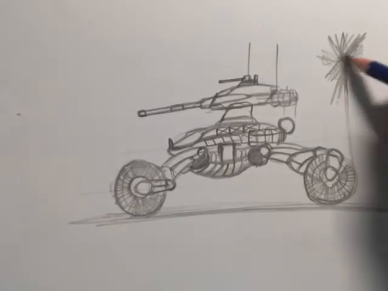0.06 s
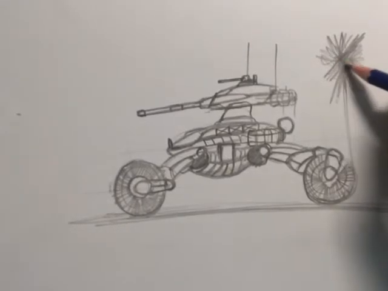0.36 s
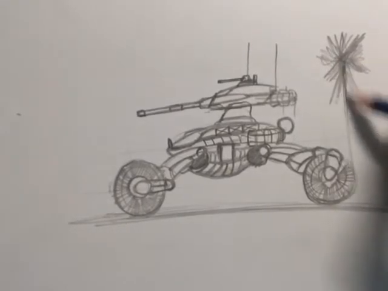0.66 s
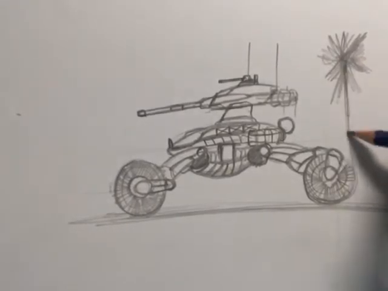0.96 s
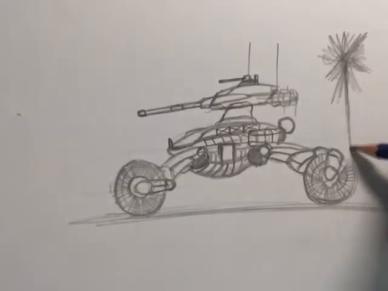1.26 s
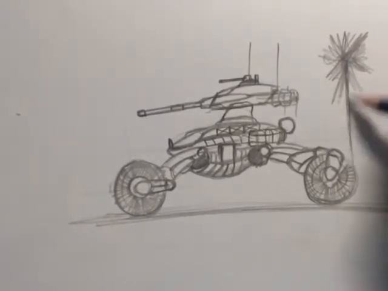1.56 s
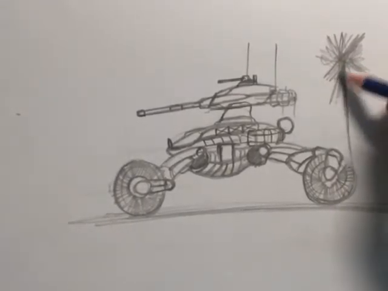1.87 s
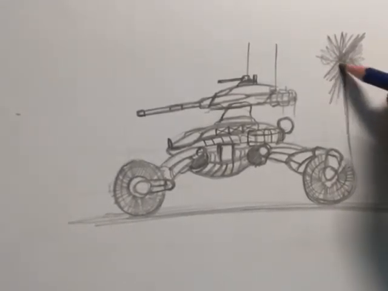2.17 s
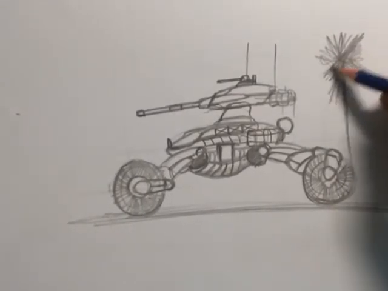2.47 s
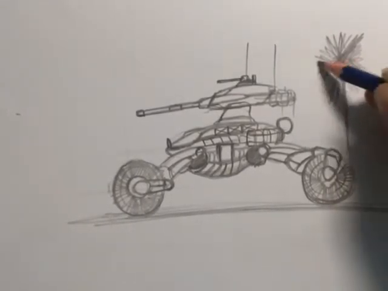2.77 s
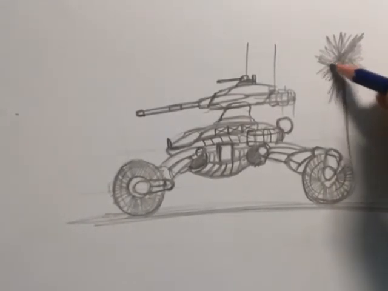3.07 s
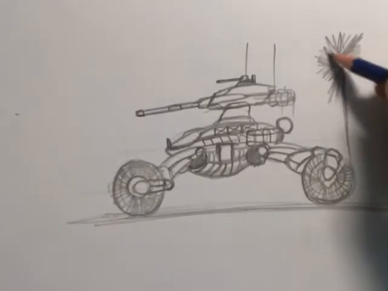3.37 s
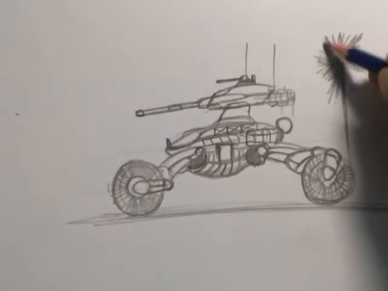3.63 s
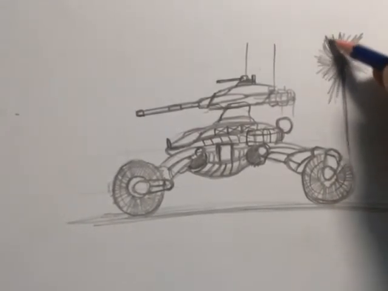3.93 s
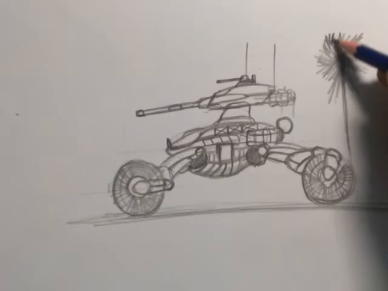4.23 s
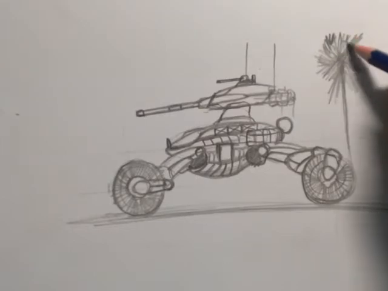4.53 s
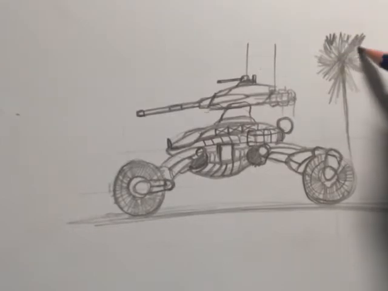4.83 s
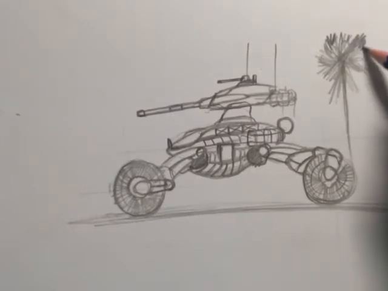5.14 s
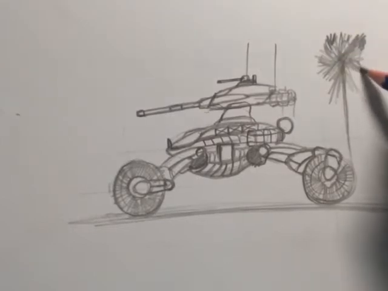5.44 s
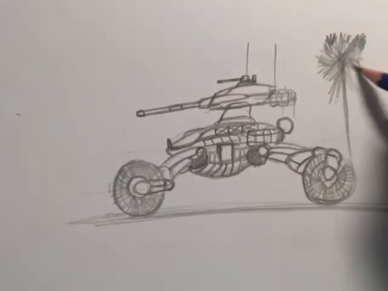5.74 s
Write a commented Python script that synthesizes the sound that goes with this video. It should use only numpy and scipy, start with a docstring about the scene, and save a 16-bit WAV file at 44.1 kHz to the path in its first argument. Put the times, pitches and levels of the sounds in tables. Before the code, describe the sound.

Light pencil lines turn into quick back-and-forth shading on paper, with a brief wooden clatter in the middle, in a quiet room.

```python
"""A pencil sketches on paper: a few separate lines, then quick short strokes back and forth.
The lead scratches as it catches on the paper's grain, and the sheet rasps under it.
Now and then the lead clicks down, and once the hand slides over the page.
Halfway through, something wooden bumps and rattles, and the room echoes briefly.
Underneath lie an uneven room rumble, faint hums, a short far drone and a hiss."""
import sys
import numpy as np
from scipy import signal
from scipy.fft import rfft, irfft, next_fast_len
from scipy.io import wavfile

SR = 44100
rng = np.random.default_rng(int(sys.argv[2]) if len(sys.argv) > 2 else 0)


def persist_wave(psi):
    """Save psi, clipped to +-1, as 16-bit WAV."""
    counts = np.round(np.clip(psi, -1, 1) * 32767).astype(np.int16)
    wavfile.write(sys.argv[1], SR, np.atleast_2d(counts).T)


N = 264598
TIME = np.arange(N) / SR
TOP_HZ = 9070  # the treble ends here

# single strokes: middle t/s, length/s, relative scratch level/dB, relative rasp level/dB
SINGLE_STROKES = [(0.083, 0.073, -71, -67), (0.225, 0.044, -62, -67.5), (0.296, 0.039, -57, -62.5),
                  (0.42, 0.11, -65.5, -69), (0.558, 0.038, -63.5, -66.5), (0.668, 0.062, -56, -67.5),
                  (0.779, 0.067, -60, -70), (0.926, 0.064, -54.5, -64), (1.045, 0.064, -56.5, -63),
                  (1.19, 0.066, -52.5, -61.5), (1.314, 0.07, -62, -68), (1.417, 0.043, -56, -61.5),
                  (1.752, 0.074, -87, -65.5), (1.823, 0.023, -87, -58), (1.898, 0.04, -58.5, -59),
                  (1.979, 0.056, -59, -58.5), (2.054, 0.049, -67, -68), (5.288, 0.054, -68.5, -70),
                  (5.958, 0.12, -66, -73.5)]
# tone of the early lines, the later short strokes and the sheet's rasp: f/Hz, level/dB
LINE_TONE = [(300, -26), (2550, -26), (3150, -10.5), (3800, -18.5), (4400, -12), (5000, -12.5), (5450, -9),
             (5950, -0.5), (6700, -1.5), (7900, -7), (8400, -1), (9100, -7.5)]
SHORT_STROKE_TONE = [(300, -11), (2400, -23), (3500, -22.5), (4500, -15.5), (5350, -14), (5850, -1.5),
                     (6350, 1.5), (7200, -1), (7700, -1.5), (8200, -5), (8700, 3.5), (9100, -5.5)]
RASP_TONE = [(120, -28), (300, -3.5), (600, -10), (800, -1), (1150, -15), (1450, -7), (1900, -6),
             (2250, -17), (3200, -15.5), (5000, -16)]
# the sheet's ring drifts as the lead moves over the page: t/s, f/Hz
SHEET_PITCH = [(0, 1520), (1.0, 1720), (2.0, 1800), (2.9, 1410), (3.95, 1350), (4.45, 1900), (5.3, 1740),
               (5.85, 1380)]
def pencil(short_from_s=2.05, scratch_gain_db=-0.02, rasp_gain_db=2.5, pitch_spread=0.043):
    """Each stroke speeds up and slows down; the lead catches on the paper's grain in tiny bursts."""
    t = TIME[:SR // 3]
    fibres, grip = wander(hz=700), wander(hz=170)  # single fibres, and wider patches that grip
    scratches, rasps = np.zeros((2, 2, N))
    for middle, length, scratch_db, rasp_db in SINGLE_STROKES + shading_strokes():
        start = max(middle - t[-1] / 2, 0)
        speed = bell(start + t - middle, length)
        ring_hz = np.interp(middle, *np.transpose(SHEET_PITCH))
        ring_hz *= 1 + pitch_spread * rng.standard_normal()
        tone = LINE_TONE if middle < short_from_s else SHORT_STROKE_TONE
        scratch = paper_spot(noise(tone, len(t), side=0.41), ripple_db=2.5, spacing_hz=168.6)
        rasp = paper_spot(noise(RASP_TONE, len(t), side=1), ripple_db=3.0, spacing_hz=90)
        rasp = sheet_ring(rasp, ring_hz)
        add(scratches, start, amp(scratch_db) * np.sqrt(speed) * scratch)  # power follows speed
        add(rasps, start, amp(rasp_db) * np.sqrt(speed) * rasp)
    scratches *= unit(amp(1.3 * fibres + 0.73 * grip))
    rasps *= unit(amp(2.0 * fibres + 0.73 * grip))
    return amp(scratch_gain_db) * scratches + amp(rasp_gain_db) * rasps


# back-and-forth runs: first t/s, last t/s, number of strokes, first level/dB, last level/dB,
# extra level midway/dB, rasp level offset/dB
SHADING_RUNS = [(2.143, 2.729, 8, -71.5, -64, 2.5, 0.5), (2.820, 3.526, 9, -64, -60, 1, -1),
                (3.611, 3.847, 4, -57.5, -62.5, 0.5, -5.5), (3.93, 4.264, 6, -59, -63.5, 3.5, -8.5),
                (4.451, 4.8, 6, -61.5, -58, -1, -7), (4.866, 5.178, 6, -61, -70, 0.5, -7),
                (5.434, 5.848, 6, -67.5, -63, 1.5, -4.5)]
def shading_strokes(fast_share=0.54, spread_db=2):
    """The hand swings at an even pace; its pressure follows a curve, but no two strokes are alike."""
    strokes = []
    for first, last, count, first_db, last_db, arch_db, rasp_db in SHADING_RUNS:
        length = fast_share * (last - first) / (count - 1)
        arch = arch_db * np.sin(np.pi * np.linspace(0, 1, count))
        levels = np.linspace(first_db, last_db, count) + arch + spread_db * rng.standard_normal(count)
        middles = np.linspace(first, last, count)
        strokes += [(s, length, db, db + rasp_db) for s, db in zip(middles, levels)]
    return strokes


def paper_spot(x, ripple_db, spacing_hz):
    """Each spot on the paper favours its own random pitches, a little different left and right."""
    grid_hz = np.arange(0, SR, spacing_hz)
    shared, left, right = rng.standard_normal((3, SR // 50))[:, :len(grid_hz)]
    ripple = np.array([np.interp(bins(x), grid_hz, shared + own) for own in (left, right)])
    return unit(irfft(rfft(x) * amp(ripple_db * ripple), x.shape[1]))


def sheet_ring(x, hz, width_hz=380, ring_db=3.5):
    """The sheet rings, which strengthens the sound near one pitch."""
    ring = amp(ring_db) / (1 + 2j * (bins(x) - hz) / width_hz)
    return unit(irfft(rfft(x) * (1 + ring), x.shape[1]))


# tone of the sliding hand: f/Hz, level/dB
HAND_TONE = [(900, -28), (1700, -10), (2250, 0), (2550, -7), (3050, 4), (3400, 3), (3750, -16), (9000, -27)]
def hand_slide(middle_s=1.626, length_s=0.17, db=-70):
    """The side of the hand rubs over the sheet with a soft hiss."""
    speed = bell(TIME - middle_s, length_s)
    return amp(db) * np.sqrt(speed) * noise(HAND_TONE, N, side=0.54)


# the lead touching down: t/s, level/dB, treble cut-off f/Hz
CLICKS = [(0.278, -53, 1590), (0.404, -53, 2800), (1.6139, -47.5, 7500), (1.632, -48.5, 2200),
          (1.822, -54, 1480), (4.939, -57, 1400), (5.858, -59, 1500)]
# tone of a click: f/Hz, level/dB
CLICK_TONE = [(300, -40), (1000, -2), (1600, -5), (2400, -1.5), (3200, -8), (4800, -9), (7000, 1),
              (9000, -4)]
def lead_clicks(fade_s=0.01, echo_db=-21, echo_s=0.95):
    """The lead clicks onto the sheet; the room answers faintly."""
    out, t = np.zeros((2, N)), TIME[:SR // 3]
    shape = fade(t, fade_s) + amp(echo_db) * fade(t, echo_s)
    for start, db, cutoff_hz in CLICKS:
        click = unit(soften(noise(CLICK_TONE, len(t), side=0.5), cutoff_hz))
        add(out, start, amp(db) * click * shape)
    return out


# knocks: t/s, ring level/dB, clatter level/dB, clatter fade/s, treble cut-off f/Hz, place hit (0-1)
WOOD_HITS = [(3.090, -40.5, -47, 0.28, 950, 0), (3.128, -44.5, -43, 0.061, 1160, 0.23),
             (3.151, -40.5, -47, 0.056, 760, 0), (3.218, -50.5, -53, 0.29, 453, 0.1),
             (3.269, -60, -55.5, 0.039, 400, 0.33), (3.307, -54, -46, 0.06, 1510, 0.5),
             (3.312, -29, -29.5, 0.24, 1750, 0.64), (3.324, -36, -37.5, 0.31, 3370, 0.8),
             (3.344, -30, -35, 0.36, 2860, 0.95), (3.374, -42.5, -34.5, 0.19, 1600, 1),
             (3.4224, -39, -31, 0.053, 1420, 0.57)]
# the notes the wood rings with: f/Hz, level hit at place 0/dB, level hit at place 1/dB, fade/s
WOOD_NOTES = [(250, -2.5, -31, 0.57), (282, 2.5, -28, 0.42), (309, -15, -2.5, 0.56),
              (368.6, -1, -1.5, 0.21), (391, 5, -17, 0.13), (511, 4, 3, 0.15), (527, -9, -8, 0.27),
              (572.6, 4, -6.5, 0.24), (606, -13, -13, 0.16), (727, -27, 3, 0.6), (710, -25, -19, .24),
              (768.5, -14, 13, 0.16), (787, -18, -0.5, 0.23), (794, 4, 6, 0.11), (854, -20, -14, 0.18),
              (1074, -3, 7, 0.13), (1119, -29, -4, 0.75), (1130, -25, 3, 0.21), (1153, 7.5, -8.5, 0.073),
              (1270, -21, -19, .2), (1430, -31, 5.5, 0.17), (1554, -22, 0.5, 0.18), (1750, -24, -4.5, 0.25),
              (2270, -32, -19, .2), (2374, -6, -11, 0.25)]
# tone of the clatter and its echo: f/Hz, level/dB
CLATTER_TONE = [(60, -43.5), (130, -19), (210, -17.5), (260, -2.5), (500, -2.5), (650, -6), (800, 5),
                (930, -8.5), (1150, 4), (1620, -15), (1950, -14), (3500, -22), (6200, -7.5), (9000, -8.5)]
def wood_knocks(rise_s=0.004, echo_db=-12, echo_rise_s=0.0044):
    """Every knock rings the same piece of wood, with a dense clatter and the room's echo."""
    out, t = np.zeros((2, N)), TIME[:2 * SR // 3]
    hz, place0_db, place1_db, ring_s = np.transpose(WOOD_NOTES)
    k = np.arange(len(WOOD_NOTES))
    skew = 0.47 * (hz / 1000) * (-1) ** k  # higher notes are more out of step between left and right
    phase = k * k + np.array([skew, -skew]) / 2
    notes = fade(t, ring_s[:, None]) * np.sin(2 * np.pi * hz[:, None] * t + phase[..., None])
    rise, echo_rise = 1 - np.exp(-t / rise_s), 1 - np.exp(-t / echo_rise_s)
    for start, ring_db, clatter_db, clatter_s, cutoff_hz, place in WOOD_HITS:
        ring = amp(place0_db + place * (place1_db - place0_db)) @ notes
        clatter = noise(CLATTER_TONE, len(t), side=0.12) * fade(t, clatter_s)
        echo_gain = amp(echo_db) * np.sqrt(10 * clatter_s)  # a longer clatter fills the room more
        clatter += echo_gain * room_echo(len(t)) * echo_rise
        for part, db in ((ring, ring_db), (clatter, clatter_db)):
            blow = soften(part * rise, cutoff_hz)
            add(out, start, amp(db) * blow / np.std(blow[:, :SR // 40]))  # first 25 ms set the level
    return out


# how long the room echoes: f/Hz, fade/s
ECHO_FADE = [(150, 0.87), (400, 0.6), (1000, 0.39), (2000, 0.23), (8000, 0.75)]
def room_echo(size):
    """The blurred echo of a knock: the bass lasts longest, and sound near 2000 Hz dies first."""
    hz, t, bands = signal.stft(noise(CLATTER_TONE, size), SR, nperseg=256)
    bands *= fade(t, read(ECHO_FADE, hz)[:, None])
    return signal.istft(bands, SR, nperseg=256)[1][:, :size]


# tone of the rumble: f/Hz, level/dB
RUMBLE_TONE = [(60, -50), (95, -18.5), (125, -7.5), (150, 3.5), (175, -10), (230, -12), (400, -22),
               (1500, -73)]
# its slow rise and fall: t/s, relative level/dB
RUMBLE_LEVEL = [(0, -60), (1.9, -60.5), (2.3, -69), (3.0, -59), (4.2, -68), (6, -65)]
# its brief swells: middle t/s, length/s, relative level/dB
RUMBLE_SWELLS = [(0.007, 0.089, -51), (0.92, 0.052, -55), (1.134, 0.067, -60.5), (1.513, 0.11, -58.5),
                 (2.914, 0.057, -53), (3.757, 0.063, -58), (5.39, 0.15, -61.5), (5.81, 0.069, -58)]
def room_rumble(gain_db=-1.5, waver_db=2.5):
    """A low rumble wavers and now and then swells."""
    rumble = noise(RUMBLE_TONE, N)
    base = amp(np.interp(TIME, *np.transpose(RUMBLE_LEVEL)) + waver_db * wander(hz=3.3))
    swell_power = sum(amp(db) ** 2 * bell(TIME - s, length) for s, length, db in RUMBLE_SWELLS)
    return amp(gain_db) * rumble * np.sqrt(base ** 2 + swell_power)


# tone of the room's rushing sound: f/Hz, level/dB
RUSH_TONE = [(60, -43), (170, -42), (230, -2), (290, 3.5), (350, -3.5), (490, -3.5), (640, -9), (800, -6),
             (1100, -13), (1600, -27.5), (2600, -29), (9000, -56)]
# its slow rise and fall: t/s, relative level/dB
RUSH_LEVEL = [(0, -59.5), (.6, -56), (1.0, -59.5), (1.9, -59.5), (3.0, -64), (4.5, -63), (6, -61)]
def room_rush(gain_db=-4.0):
    """A soft rushing sound, higher than the rumble, drifts in loudness."""
    return noise(RUSH_TONE, N) * amp(gain_db + np.interp(TIME, *np.transpose(RUSH_LEVEL)))


# the hums: f/Hz, level/dB, width/Hz
HUM_NOTES = [(200.2, -69.5, 8.6), (291.3, -78, 15), (1337, -79, 49)]
def hums():
    """Three faint notes waver in the room."""
    return sum(amp(db) * waver(hz, width_hz) for hz, db, width_hz in HUM_NOTES)


# the drone's course: t/s, f/Hz, level/dB
DRONE_PATH = [(0, 510, -68.5), (.38, 506, -75), (.55, 501.3, -63), (0.82, 495, -64.5), (.88, 383, -65),
              (1.0, 340, -100)]
def far_drone():
    """A faint, far drone drops in pitch and sinks away within the first second."""
    s, hz, db = np.transpose(DRONE_PATH)
    return amp(np.interp(TIME, s, db)) * waver(np.interp(TIME, s, hz), width_hz=19)


# tone of the hiss: f/Hz, level/dB
HISS_TONE = [(20, 8), (70, 7), (150, 12), (400, 6), (1000, 3), (2500, 0), (4000, -.5), (6300, 1), (9000, 0)]
def hiss(db=-65.0):
    """A steady hiss lies under everything."""
    return amp(db) * noise(HISS_TONE, N, side=0.16)


# how alike left and right are: f/Hz, likeness (1 = the same)
LIKENESS = [(25, .75), (125, .985), (300, .985), (600, .92), (1200, .68), (2500, .45), (8000, .45)]
# the pencil's direction at side=1: f/Hz, left minus right level/dB
PENCIL_BALANCE = [(300, -19.5), (850, -2.5), (1250, -15.5), (1550, -11), (2200, 3), (3100, 7), (4500, 4),
                  (5900, 13), (6700, 5.5), (9000, 9)]
def noise(tone, size, side=0):
    """Stereo noise shaped by a tone table, then scaled to strength 1; side leans it to the pencil."""
    padded = next_fast_len(size)
    hz = np.fft.rfftfreq(padded, 1 / SR)
    a, b = rfft(rng.standard_normal((2, padded))) * (hz < TOP_HZ)
    likeness = read(LIKENESS, hz)
    middle, wide = a * np.sqrt(1 + likeness), b * np.sqrt(1 - likeness)
    lean = amp(side * read(PENCIL_BALANCE, hz) / 2)
    spectrum = np.array([(middle + wide) * lean, (middle - wide) / lean]) * amp(read(tone, hz))
    return unit(irfft(spectrum, padded)[:, :size])


def wander(hz):
    """A smooth random wobble, with changes up to about hz."""
    x = rng.standard_normal(next_fast_len(N))
    return unit(irfft(rfft(x) * np.exp(-(bins(x) / hz) ** 2), len(x))[:N])


def waver(hz, width_hz):
    """An unsteady note on a fixed or moving pitch."""
    turns = np.cumsum(hz * np.ones(N)) / SR
    wobble = wander(width_hz) + 1j * wander(width_hz)
    return unit((wobble * np.exp(2j * np.pi * turns)).real)


def soften(x, hz):
    """A softer contact loses the treble above hz."""
    return signal.sosfilt(signal.butter(2, hz, fs=SR, output="sos"), x)


def bell(t, length):
    """A smooth rise and fall around t = 0, above half height for the given length."""
    return .5 ** (abs(2 * t / length) ** 2.4)


def fade(t, fade_s):
    """Dies away by 60 dB in fade_s seconds."""
    return amp(-60 * t / fade_s)


def amp(db):
    """Turns decibels into a multiplier."""
    return 10 ** (np.asarray(db) / 20)


def unit(x):
    """Scales a sound to an average strength (rms) of 1."""
    return x / np.sqrt(np.mean(x ** 2) + 1e-20)


def read(points, hz):
    """Reads between a table's rows, with octaves evenly spaced."""
    f, value = np.transpose(points)
    return np.interp(np.log(hz + 1), np.log(f + 1), value)


def bins(x):
    """The frequencies that make up a sound."""
    return np.fft.rfftfreq(x.shape[-1], 1 / SR)


def add(mix, s, sound):
    """Mixes a stereo sound in at s seconds."""
    part = mix[:, round(s * SR):][:, :sound.shape[1]]
    part += sound[:, :part.shape[1]]


def scene():
    """Pencil, hand, clicks and knocks over the sound of the room."""
    foreground = pencil() + hand_slide() + lead_clicks() + wood_knocks()
    return foreground + room_rumble() + room_rush() + hums() + far_drone() + hiss()


def record(dry):
    """A steep filter cuts off the highest treble."""
    treble_cut = signal.firwin(801, TOP_HZ, window=("kaiser", 9), fs=SR)
    return signal.oaconvolve(dry, treble_cut[None], "same")


dry = scene()
out = record(dry)
persist_wave(out)
```